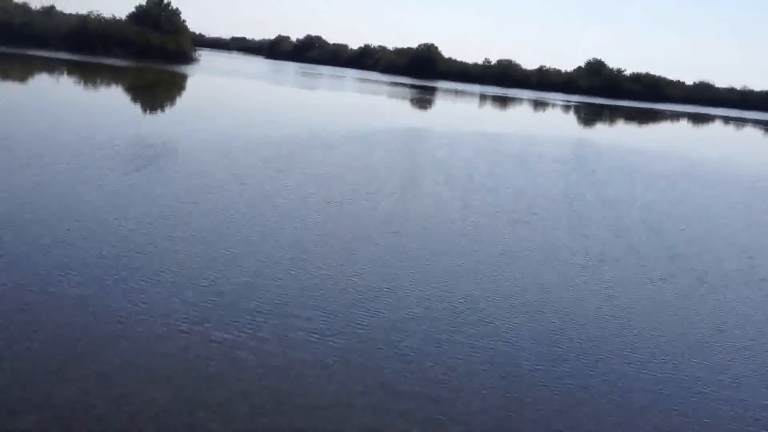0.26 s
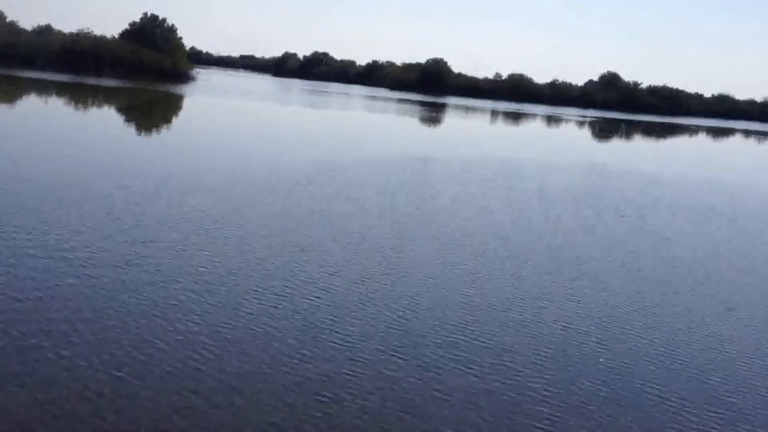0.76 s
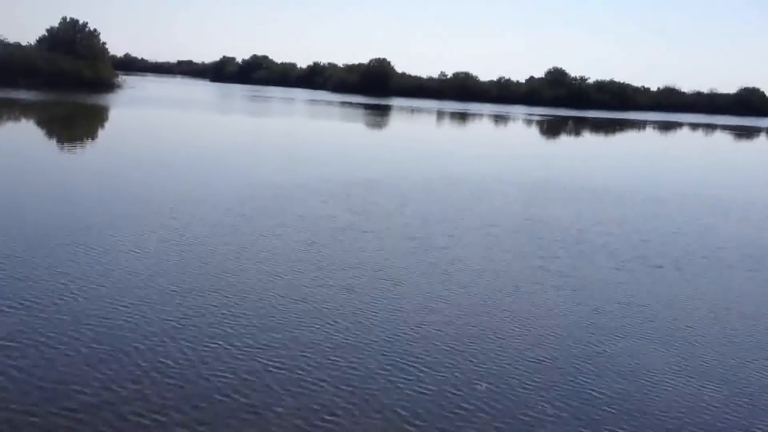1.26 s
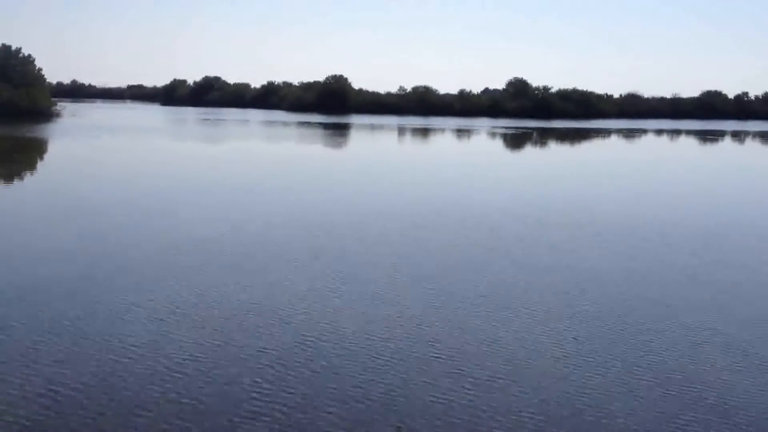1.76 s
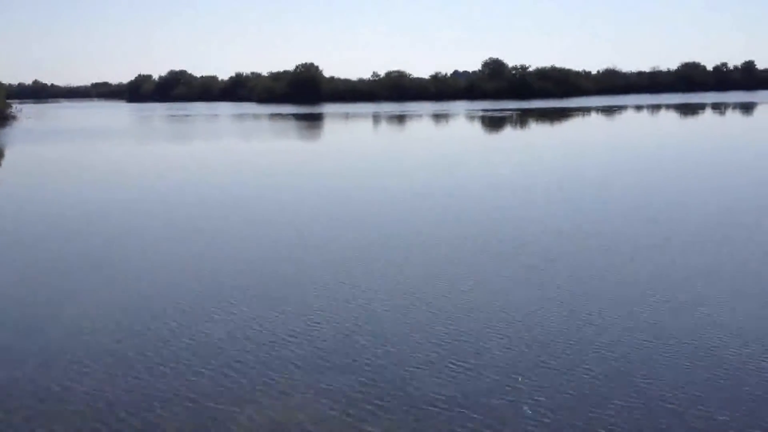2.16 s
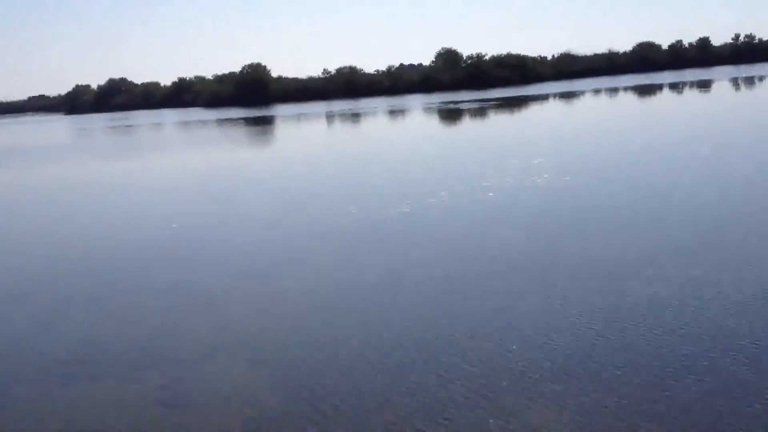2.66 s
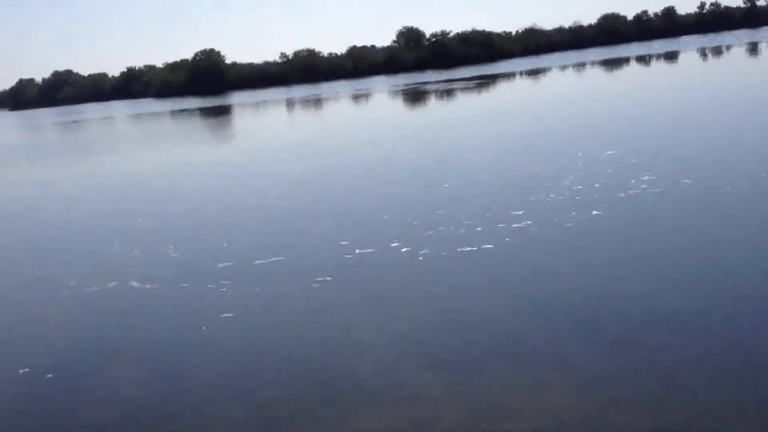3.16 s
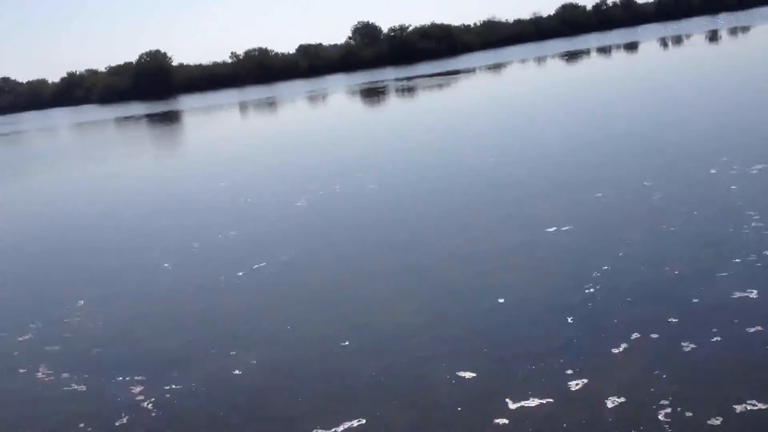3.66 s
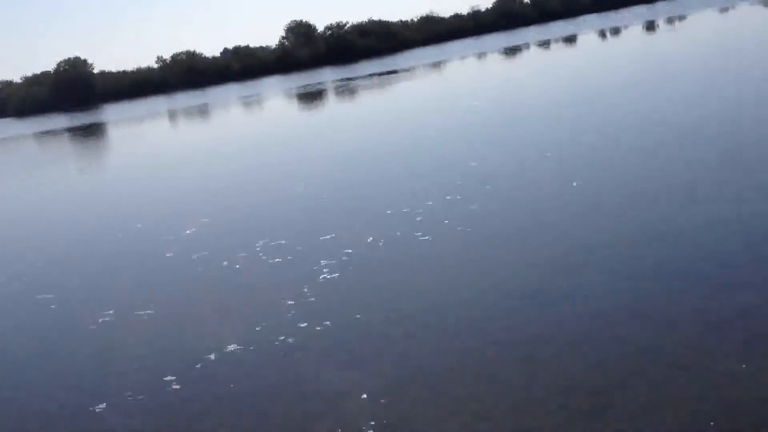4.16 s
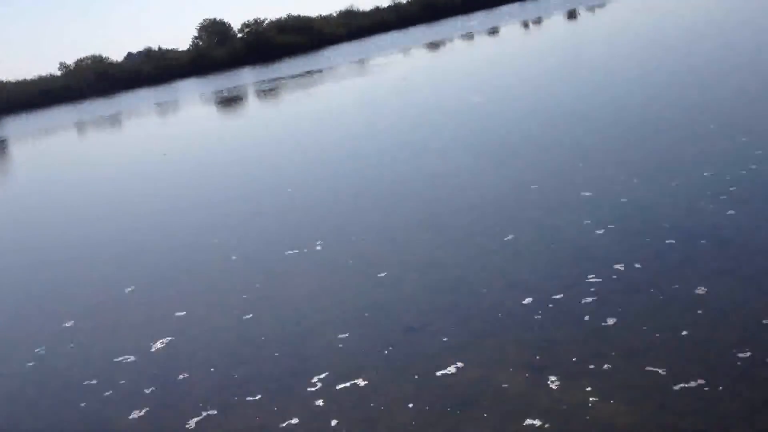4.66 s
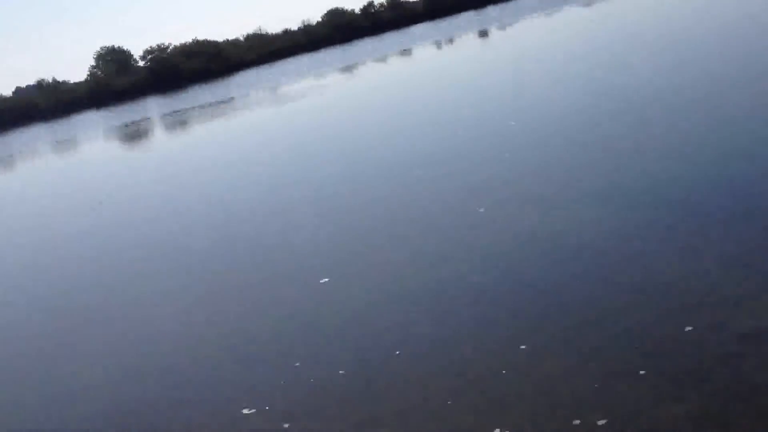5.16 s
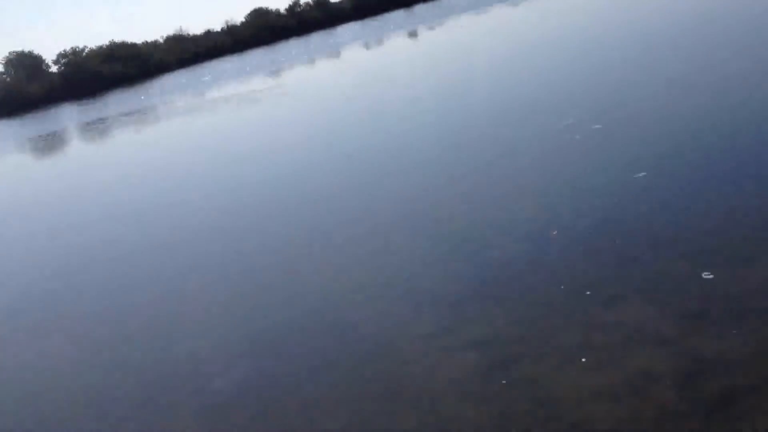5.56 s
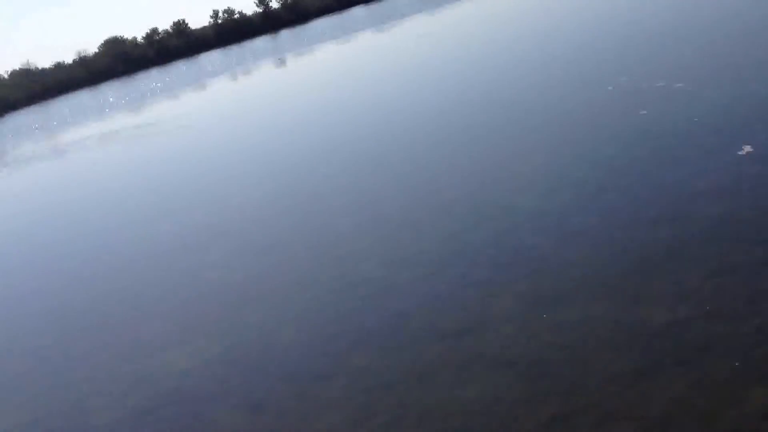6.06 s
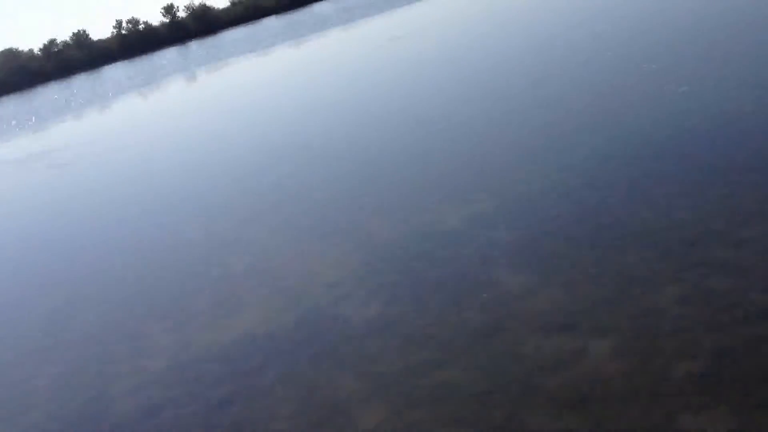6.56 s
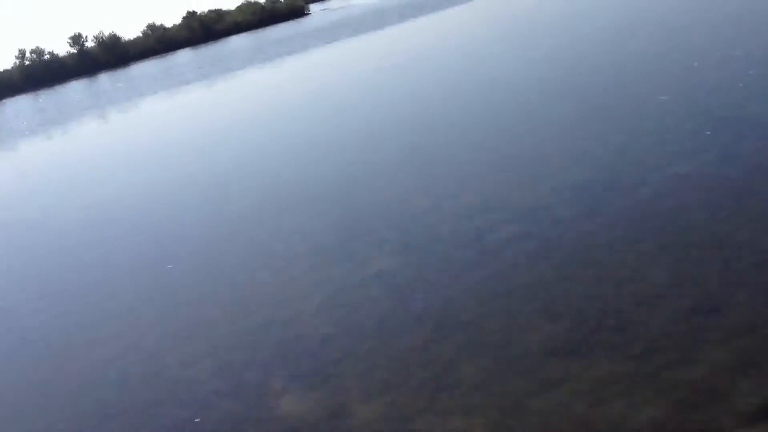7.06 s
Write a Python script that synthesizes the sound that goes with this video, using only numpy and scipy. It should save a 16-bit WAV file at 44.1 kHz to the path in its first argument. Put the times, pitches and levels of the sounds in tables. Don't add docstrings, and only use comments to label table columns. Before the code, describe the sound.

From 0 to about 2.7 seconds an airboat drones loudly and steadily: a strong engine tone near 200 hertz, deeper propeller hum around 140, wavering harmonics, a throbbing low roar and a fine spray hiss. From 2.7 to 3.2 a few very short wind puffs tap and thump the microphone. A faint double metallic tick comes at 3.5 with another puff. The drone continues until 4.1, when puffs return in quick flutters. From about 4.75 wind hits in dense, ragged, hissing gusts with low thumps, ducking the boat. Engine pitch climbs gradually, reaching roughly 225 hertz by the end. From 6.0 to 7.0 the wind is almost continuous and bright, with a small clear ping near 6.9. After 7.1 it breaks into sputters and the engine's firing tone comes forward again. The sound is dry, close and outdoors, stopping still under way.

```python
import sys
import numpy as np
from scipy import signal
from scipy.io import wavfile
from scipy.ndimage import uniform_filter1d

SR = 44100
rng = np.random.default_rng(int(sys.argv[2]) if len(sys.argv) > 2 else 0)


def unload_wav(signal):
    wavfile.write(
        sys.argv[1],
        SR,
        np.round(np.clip(np.atleast_2d(signal).T, -1, 1) * 32767).astype(np.int16),
    )


def volts(x):
    e = np.asarray(x, float) / 20
    return 10 ** e


N = 322812

# t/s, f/Hz (turns per second)
CRANK = [(0, 66.95), (1.2, 67.55), (2.4, 67.55), (2.9, 68.04), (3.5, 68.5), (4.0, 67.58), (4.7, 68.83),
         (5.1, 68.97), (5.5, 71.02), (6.0, 72.46), (6.5, 73.6), (6.9, 74.5), (7.32, 75.4)]
# t/s, firing level/dB, blade level/dB, other engine orders level/dB
TONES = [(0, -8, -19, -1), (0.9, -7, -16, -3.5), (1.55, -8, -22, -0.5), (2.05, -8.5, -19, 0.5),
         (2.35, -8, -25, 2), (2.9, -11, -33, 1), (3.1, -11, -27, 3.5), (3.4, -7.5, -26.5, 2.5),
         (3.75, -11, -23, 2), (4.05, -10.5, -28, 1), (4.3, -10.5, -26, 2.5), (4.7, -11.5, -19, 0.5),
         (4.85, -16.5, -22, -1), (5.25, -21.5, -38, 1.5), (5.5, -18.5, -22, 2), (6.35, -18.5, -18.5, -1.5),
         (6.95, -20.5, -20.5, -0.5), (7.32, -13, -19, 0)]
BOAT_DB = -18


def rms_one(x):
    return x / np.sqrt(np.mean(x ** 2) + 1e-20)


def in_time(rows):
    s, *columns = np.transpose(rows)
    return [np.interp(np.arange(N) / SR, s, c) for c in columns]


def lag(x, seconds):
    r = np.exp(-1 / (seconds * SR))
    return signal.lfilter([1 - r], [1, -r], x)


def drift(rate_hz):
    settle = 4000
    r = np.exp(-40 * np.pi * rate_hz / SR)
    white = rng.standard_normal(N // 20 + settle + 2)
    slow = signal.lfilter([1], [1, -2 * r, r * r], white)[settle:]
    return np.interp(np.arange(N) / 20, np.arange(len(slow)), rms_one(slow))


def banded_noise(spectrum, patchy_db, shared_db, count=2):
    hz, level_db = np.transpose(spectrum)
    edges = np.geomspace(hz[0], hz[-1], int(count * np.log2(hz[-1] / hz[0])) + 2)
    white = rng.standard_normal((2, N))
    out = 0
    for k, (low, high) in enumerate(zip(edges, edges[1:])):
        band_pass = signal.butter(2, [low, high], "band", fs=SR, output="sos")
        band = signal.sosfilt(band_pass, white[k % 2])
        band_db = np.interp(np.log(low * high) / 2, np.log(hz), level_db)
        out = out + volts(band_db + shared_db + patchy_db * drift(9.0)) * band
    return rms_one(out)


def tones(turns, orders, load, waver_db, jitter):
    out = 0
    for multiple, cruise_db, full_db in orders:
        level_db = cruise_db + load * (full_db - cruise_db) + waver_db * drift(7.1)
        phase = 2 * np.pi * (multiple * turns + rng.random()) + jitter * drift(7.0)
        out = out + np.sqrt(2) * volts(level_db) * np.sin(phase)
    return out


def engine(turns, load):
    # multiple of crank speed, cruise level/dB, full-revs level/dB
    crank_orders = [(1, -15, -41), (2, -12, -16), (4, -7.5, -0.5), (5, -9.5, -9), (6, -7.5, -21),
                    (7, -17, -19), (8, -20, -19.5), (9, -44, -15), (11, -25, -16), (12, -24, -23),
                    (14, -37, -39), (16, -29.5, -37), (17, -25, -30), (19, -16, -52)]
    firing_db, _, orders_db = in_time(TONES)
    firing = tones(turns, [(3, 0, 0)], load, waver_db=1.4, jitter=0.067)
    others = tones(turns, crank_orders, load, waver_db=2.0, jitter=0.35)
    return volts(firing_db) * firing + volts(BOAT_DB + orders_db) * others


def propeller(turns, load):
    shaft_orders = [(3.01, -28, -20), (3.925, -23.5, -22), (6.047, -8.5, -4.5), (8.02, -13, -8),
                    (10, -13.5, -22), (12.79, -14.5, -26), (15.96, -58, -9.5), (24.03, -20, -24)]
    shaft_turns = 0.4243 * turns
    _, blade_db, _ = in_time(TONES)
    blades = tones(shaft_turns, [(5, 1.4, 0.85)], load, waver_db=1.5, jitter=0.48)
    others = tones(shaft_turns, shaft_orders, load, waver_db=1.5, jitter=0.79)
    return volts(blade_db) * blades + volts(BOAT_DB) * others


def roar(turns):
    # f/Hz, level/dB per Hz
    roar_colour = [(25, 3), (60, -7.5), (110, -11), (160, -3.5), (250, -6), (420, -5), (700, -11),
                   (1000, -11.5), (1400, -11.5), (2000, -11)]
    throb = 1 + 0.079 * np.cos(2 * np.pi * turns) + 0.16 * np.cos(6 * np.pi * turns)
    noise = throb * banded_noise(roar_colour, patchy_db=1.06, shared_db=0.6 * drift(12))
    silencer = signal.butter(4, 1510, fs=SR, output="sos")
    return volts(BOAT_DB - 0.5) * signal.sosfilt(silencer, noise)


def boat():
    cruise_hz, full_hz = 68, 73
    crank_hz, = in_time(CRANK)
    turns = np.cumsum(crank_hz) / SR
    load = np.clip((crank_hz - cruise_hz) / (full_hz - cruise_hz), 0, 1)
    return engine(turns, load) + propeller(turns, load) + roar(turns)


def spray():
    # f/Hz, level/dB per Hz
    spray_colour = [(1500, -3.5), (2200, 3), (3000, -2.5), (4200, -1), (5200, -2.5), (6200, -9),
                    (8000, -10), (11200, -12.5)]
    flicker_db = 1.0 * drift(6.4) + 0.53 * drift(90)
    return volts(-32) * banded_noise(spray_colour, patchy_db=0.24, shared_db=flicker_db)


def wind(gate, duck):
    # f/Hz, level/dB per Hz
    mid_colour = [(700, -17), (1400, -6), (2100, 0.5), (2800, 1), (3600, 1), (4400, -1), (5000, -4),
                  (5600, -8.5), (6500, -12.5), (8000, -23.5)]
    low_colour = [(300, -1.5), (600, -3), (1000, -3.5), (1500, -4), (2300, -11.5)]
    top_colour = [(5000, -9), (6200, -2.5), (8000, -0.5), (11200, -9)]
    calm_db, wake_db, wake_s = -39, -18, 0.093
    slow_hz, fast_hz = 68.9, 70.8
    dull_hz, dull_db, dull_top_db = 2600, -5, -2

    mid, low, top = gate + 0.05 * np.maximum(gate - lag(gate, 0.003), 0)
    lull = volts(calm_db) * duck + volts(wake_db) * lag(gate[0], wake_s)
    slow = np.clip((fast_hz - in_time(CRANK)[0]) / (fast_hz - slow_hz), 0, 1)
    buffet_db = 0.5 * drift(30) + 1.5 * drift(220)
    noise = banded_noise(mid_colour, patchy_db=1.1, shared_db=buffet_db, count=4)
    body = signal.sosfilt(signal.butter(2, dull_hz, fs=SR, output="sos"), noise)
    low_noise = banded_noise(low_colour, patchy_db=0.0, shared_db=buffet_db)
    top_noise = banded_noise(top_colour, patchy_db=2.0, shared_db=0.6 * buffet_db)
    hiss = volts(-2.5) * ((mid + lull) * noise + volts(dull_db) * slow * mid * body)
    hiss += volts(-4.5) * low * low_noise
    return hiss + volts(-7.5 + dull_top_db * slow) * top * top_noise


def airstream():
    # t/s, length/s, level/dB, low thump relative
    # level/dB
    short_puffs = [(2.69, 0.0087, -17.5, 8), (2.762, 0.0066, -10, -2), (2.846, 0.031, -17, 4),
                   (2.975, 0.014, -46, 22), (3.057, 0.023, -32.5, 15), (3.175, 0.0055, -16, 8.5),
                   (3.543, 0.0074, -32, 11), (4.113, 0.0058, -15, 2), (4.179, 0.009, -16.5, 4.5),
                   (4.265, 0.016, -18, 2.5), (4.376, 0.0088, -23.5, 7.5), (4.412, 0.02, -15.5, 7),
                   (4.514, 0.013, -12.5, 2.5), (4.562, 0.012, -14, 0.5), (4.723, 0.022, -11, -2.5),
                   (7.125, 0.023, -20, 5.5), (7.152, 0.043, -18.5, 2), (7.198, 0.0054, -17, -13),
                   (7.217, 0.016, -25, 0)]
    # t/s, length/s, level/dB
    held_gusts = [(4.767, 0.12, -12), (4.866, 0.012, -18), (4.877, 0.012, -13), (4.916, 0.018, -15),
                  (4.935, 0.023, -13), (4.992, 0.023, -10.5), (5.033, 0.025, -12), (5.068, 0.022, -14),
                  (5.14, 0.048, -11), (5.188, 0.12, -13), (5.321, 0.065, -13), (5.4, 0.086, -13.5),
                  (5.488, 0.03, -18.5), (5.522, 0.058, -13), (5.59, 0.023, -11.5), (5.633, 0.014, -18),
                  (5.666, 0.025, -11.5), (5.686, 0.014, -21), (5.705, 0.064, -13.5), (5.773, 0.035, -16),
                  (5.826, 0.035, -14.5), (5.869, 0.155, -17), (6.012, 0.4, -15.5), (6.404, 0.5, -15.5),
                  (6.886, 0.14, -14.5), (7.03, 0.084, -17), (7.111, 0.015, -31), (7.247, 0.025, -21),
                  (7.27, 0.024, -26), (7.294, 0.015, -13)]
    puff_top_db, gust_top_db = -28, -12.5
    thump_db, thump_s, held_low_db = -2, 0.016, -15.5
    tail_db, tail_s = -12.5, 0.013
    edge_s, thump_lead_s = 0.0045, 0.003

    puffs, held = np.zeros((3, N)), np.zeros(N)
    for start, length, level_db, low_db in short_puffs:
        span = slice(round(start * SR), round((start + length) * SR))
        puffs[:, span] = volts(level_db + np.array([[0], [low_db], [puff_top_db]]))
    for start, length, level_db in held_gusts:
        held[round(start * SR):round((start + length) * SR)] = volts(level_db)
    lumps = volts(0.8 * drift(25))
    held = lumps * np.maximum(held, volts(tail_db) * lag(held, tail_s))
    thump = volts(thump_db) * np.maximum(held - lag(held, thump_s), 0) + volts(held_low_db) * held
    puffs[1] = np.maximum(puffs[1], np.roll(puffs[1], -round(thump_lead_s * SR)))
    gate = puffs + [held, thump, volts(gust_top_db) * held]
    edge = round(edge_s * SR)
    return uniform_filter1d(uniform_filter1d(gate, edge), edge)


def ducking(gate):
    threshold_db, share, attack_s, recover_db_per_s = -23, 0.29, 0.0053, 26
    wind_db = 20 * np.log10(gate[0] + gate[1] + 1e-9)
    cut_db = share * np.maximum(wind_db - threshold_db, 0)
    climb_db = recover_db_per_s * np.arange(N) / SR
    held_cut_db = np.maximum.accumulate(cut_db + climb_db) - climb_db
    return volts(-lag(held_cut_db, attack_s))


def fittings():
    # t/s, f/Hz, level/dB, length/s
    pings = [
        (3.538, 2320, -24, .018),
        (3.542, 2850, -26, 0.019),
        (6.887, 3050, -15, .024),
        (6.877, 6250, -22, .02),
    ]
    out = np.zeros(N)
    for start, hz, level_db, length in pings:
        t = np.arange(round(length * SR)) / SR
        swell = volts(level_db) * np.sin(np.pi * t / length)
        out[round(start * SR):][:len(t)] += swell * np.sin(2 * np.pi * hz * t)
    return out


def scene():
    gate = airstream()
    duck = ducking(gate)
    mix = duck * (boat() + spray()) + wind(gate, duck) + fittings()
    return mix[None]


def roll_off(x):
    return signal.sosfilt(signal.butter(12, 11120, fs=SR, output="sos"), x)


def record(dry):
    bass_cut_hz, port_hz, port_width_hz, port_db = 132.6, 4960, 620, 9
    x = signal.sosfilt(signal.butter(2, bass_cut_hz, "high", fs=SR, output="sos"), dry)
    r, w = np.exp(-np.pi * port_width_hz / SR), 2 * np.pi * port_hz / SR
    resonance = signal.lfilter([(1 - r * r) / 2, 0, (r * r - 1) / 2], [1, -2 * r * np.cos(w), r * r], x)
    x = x + volts(port_db) * resonance
    x = x / (1 + np.abs(x / 1.05) ** 6) ** (1 / 6)
    return roll_off(x)


dry = scene()
out = record(dry)
unload_wav(out)
```